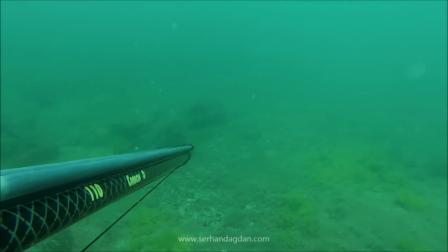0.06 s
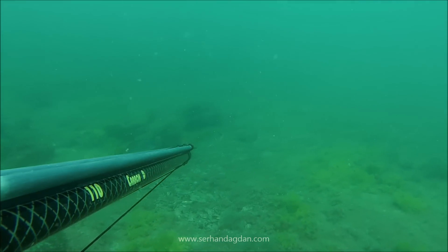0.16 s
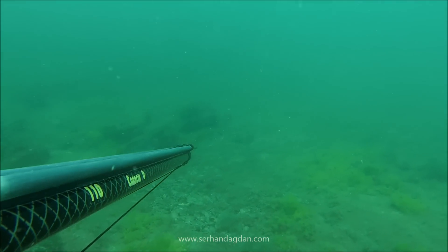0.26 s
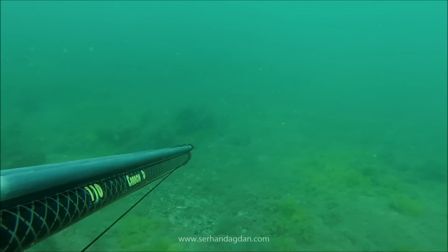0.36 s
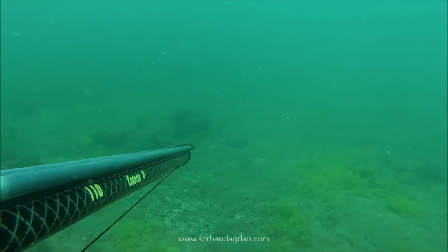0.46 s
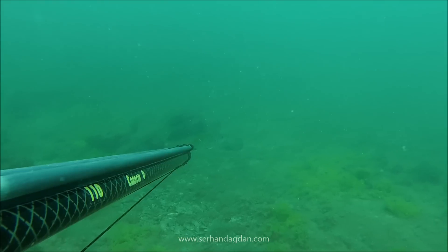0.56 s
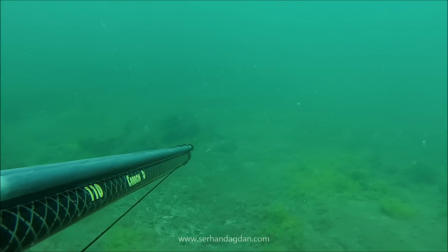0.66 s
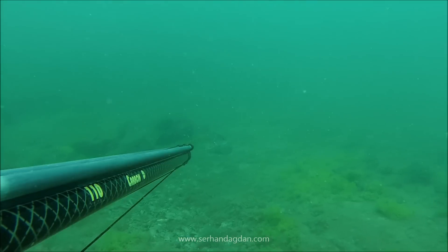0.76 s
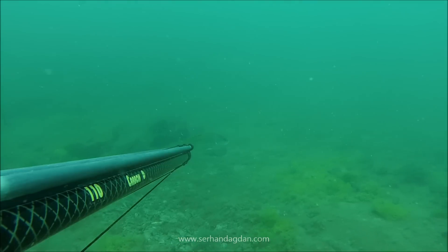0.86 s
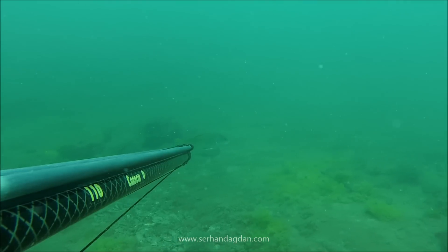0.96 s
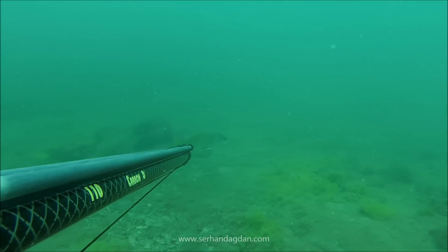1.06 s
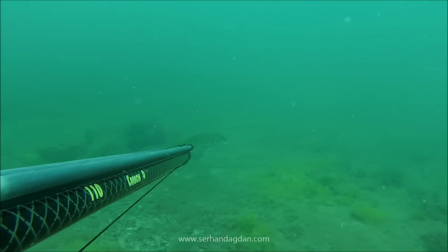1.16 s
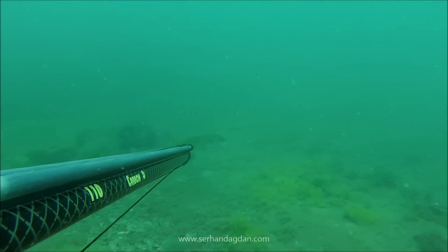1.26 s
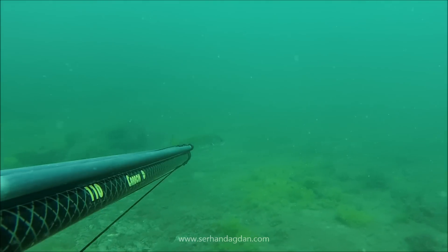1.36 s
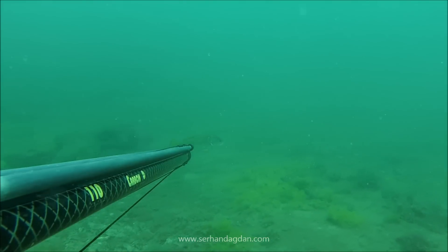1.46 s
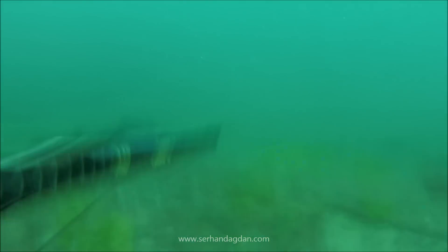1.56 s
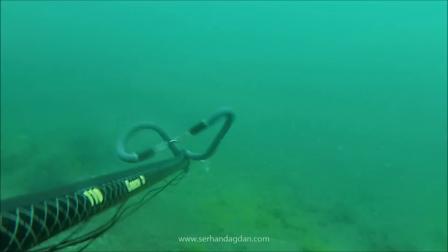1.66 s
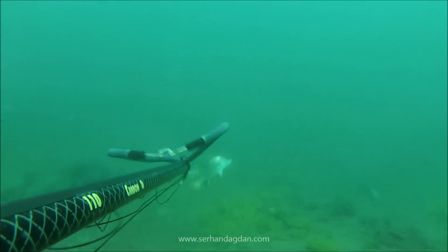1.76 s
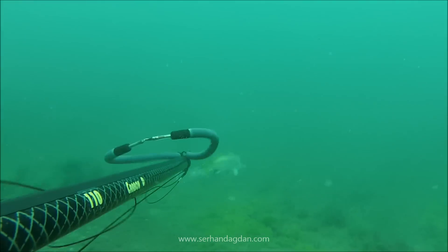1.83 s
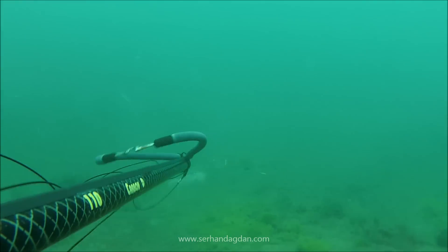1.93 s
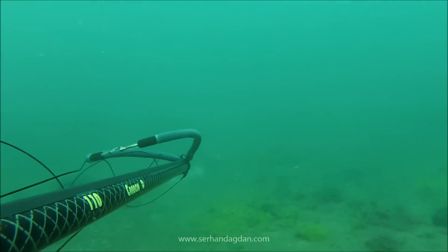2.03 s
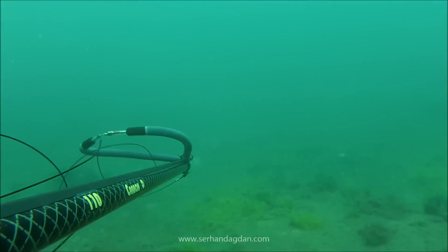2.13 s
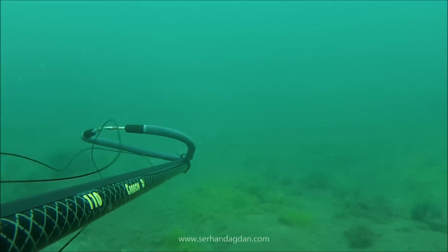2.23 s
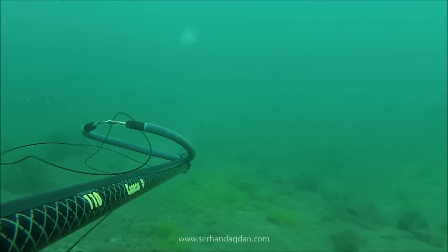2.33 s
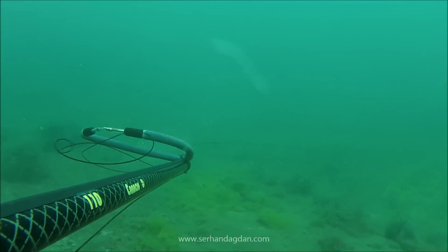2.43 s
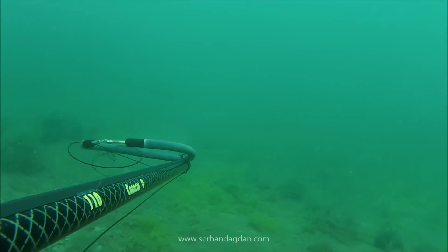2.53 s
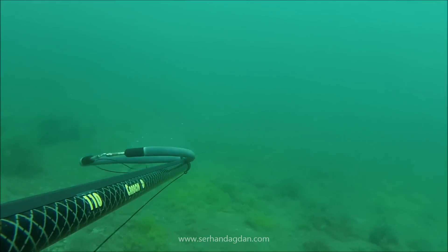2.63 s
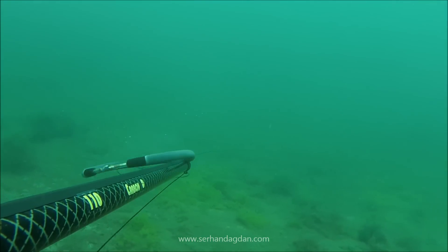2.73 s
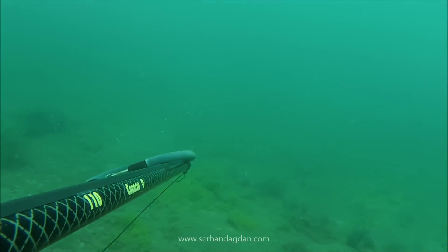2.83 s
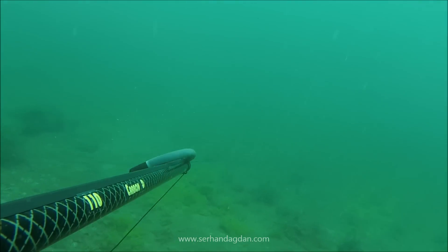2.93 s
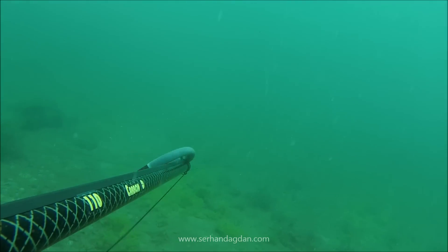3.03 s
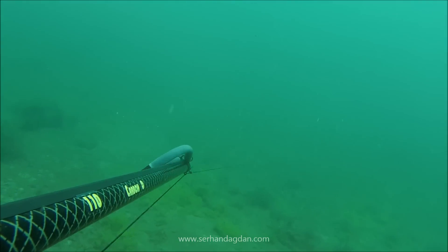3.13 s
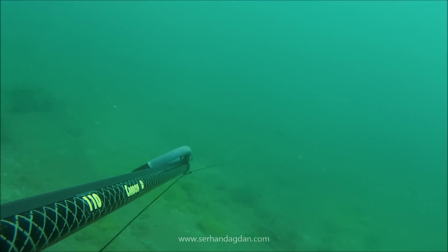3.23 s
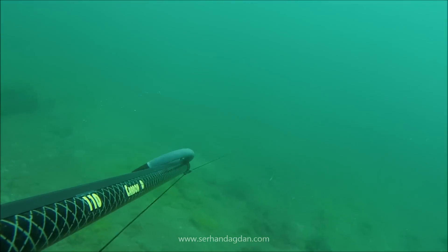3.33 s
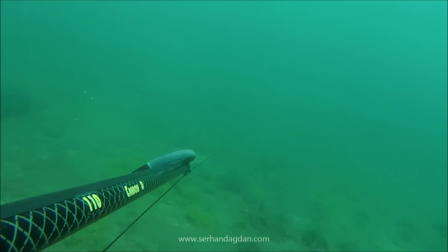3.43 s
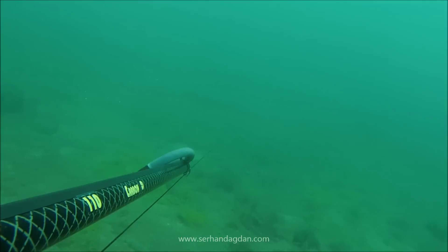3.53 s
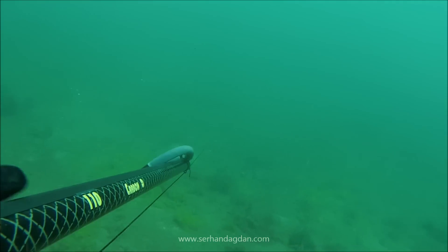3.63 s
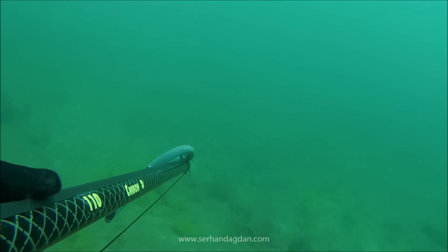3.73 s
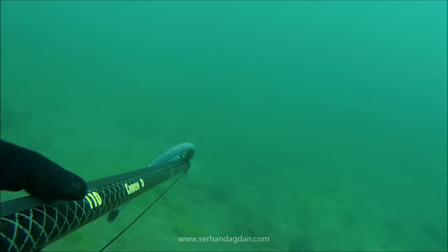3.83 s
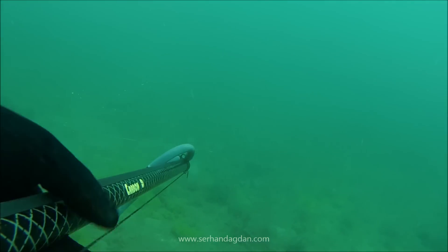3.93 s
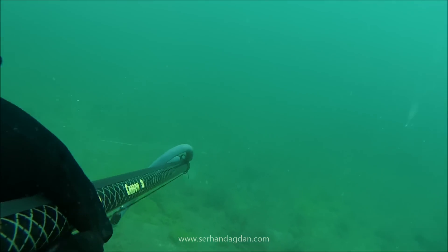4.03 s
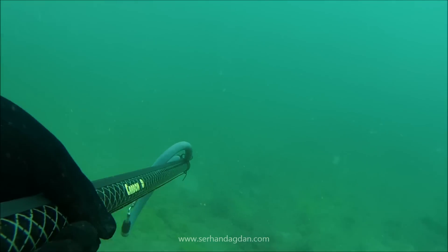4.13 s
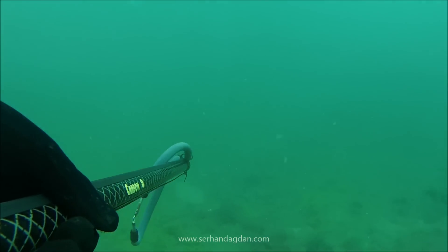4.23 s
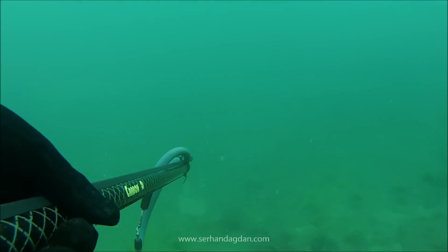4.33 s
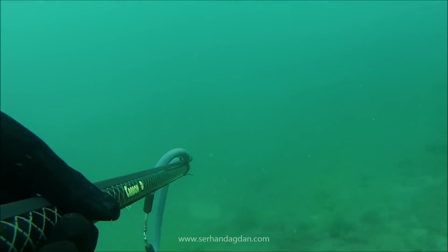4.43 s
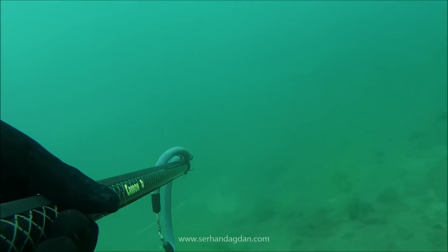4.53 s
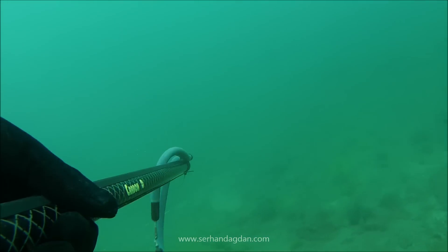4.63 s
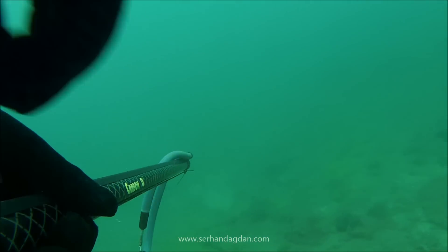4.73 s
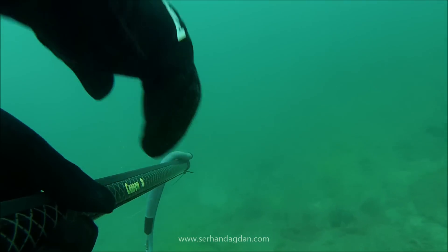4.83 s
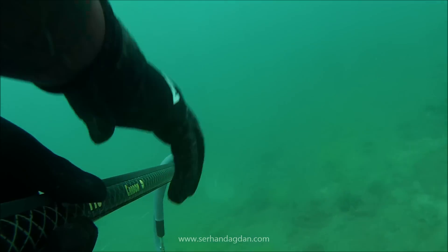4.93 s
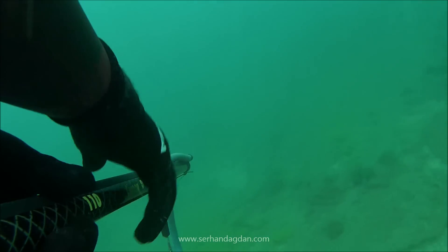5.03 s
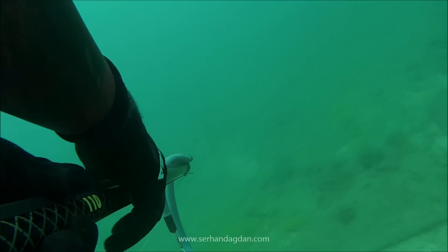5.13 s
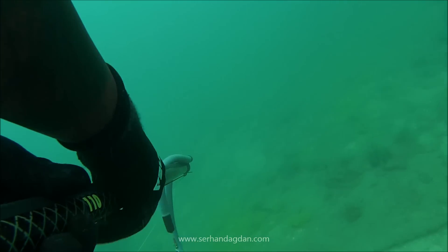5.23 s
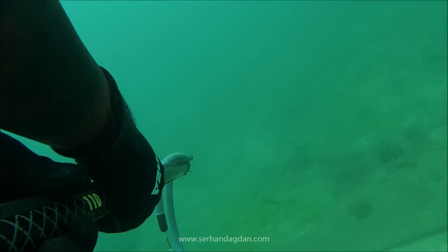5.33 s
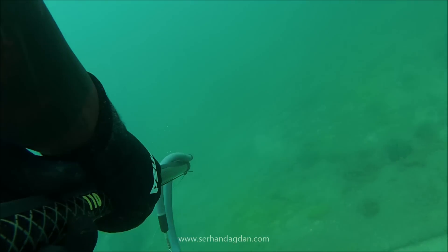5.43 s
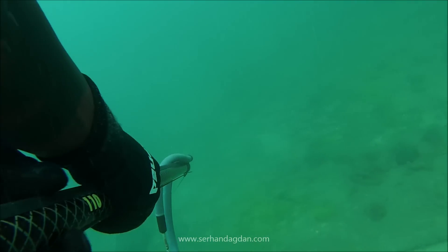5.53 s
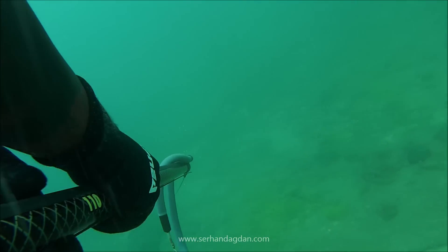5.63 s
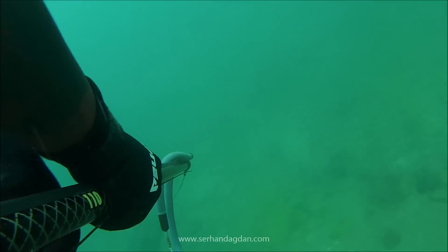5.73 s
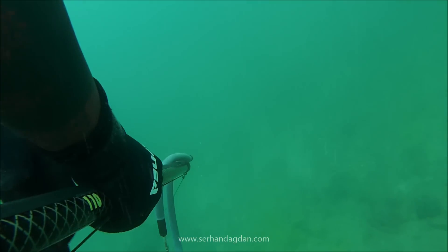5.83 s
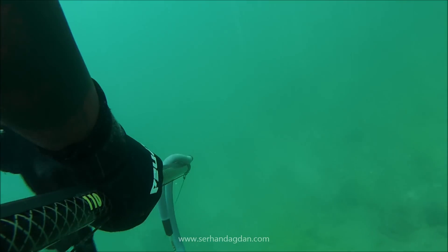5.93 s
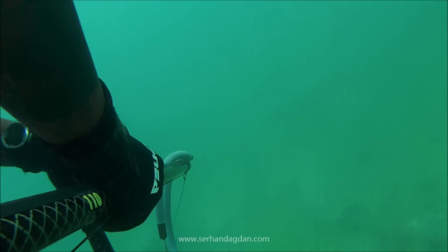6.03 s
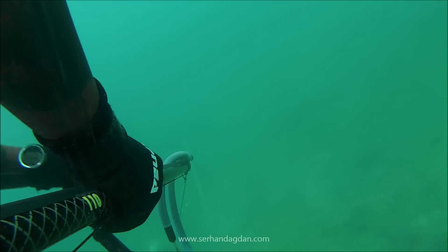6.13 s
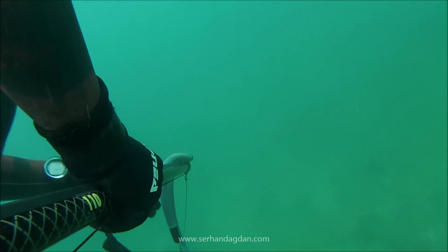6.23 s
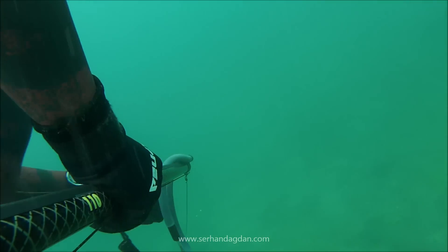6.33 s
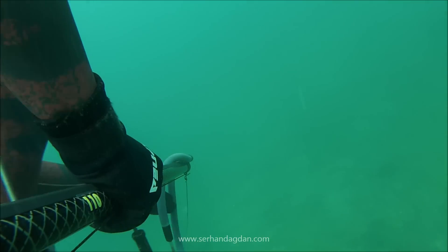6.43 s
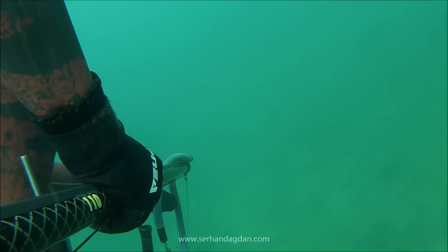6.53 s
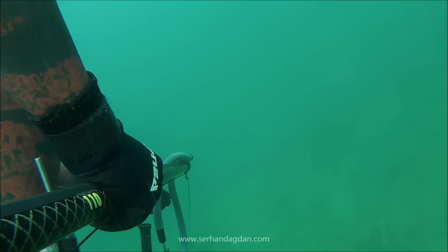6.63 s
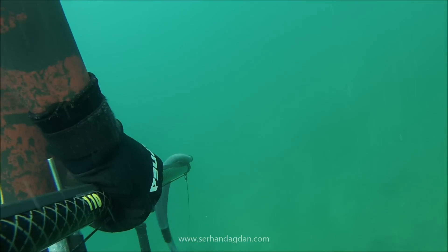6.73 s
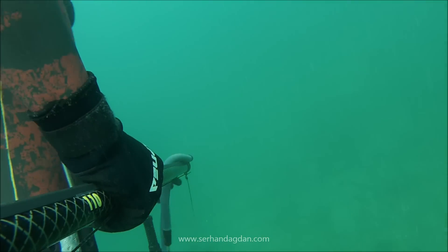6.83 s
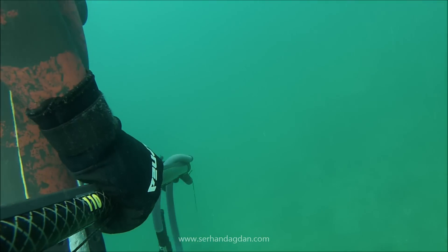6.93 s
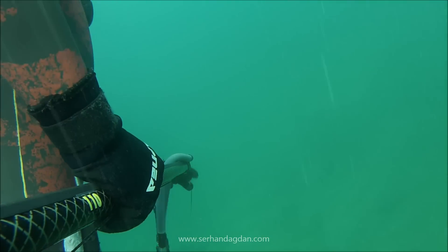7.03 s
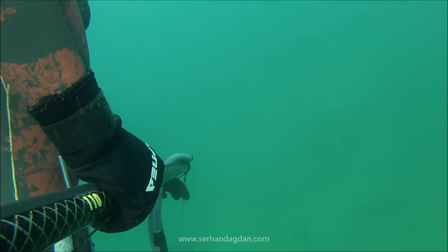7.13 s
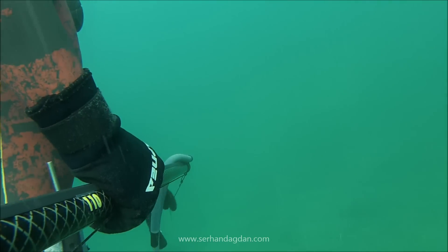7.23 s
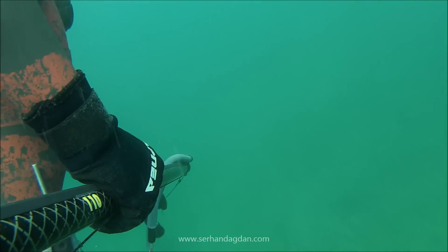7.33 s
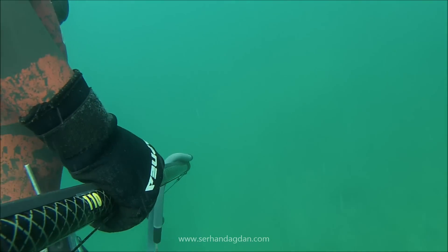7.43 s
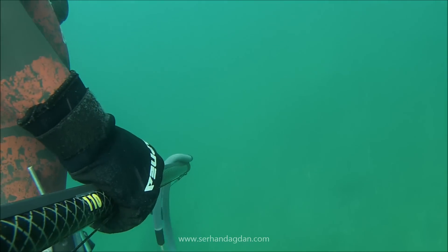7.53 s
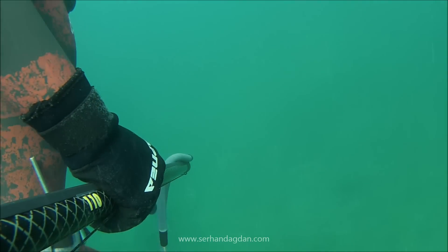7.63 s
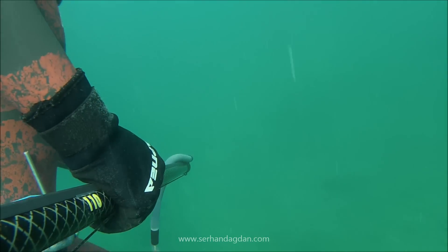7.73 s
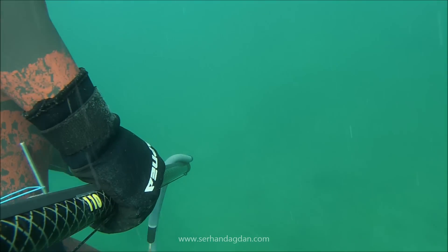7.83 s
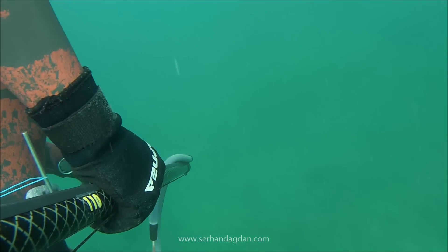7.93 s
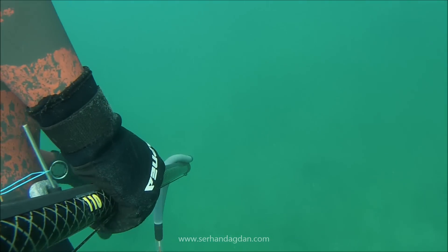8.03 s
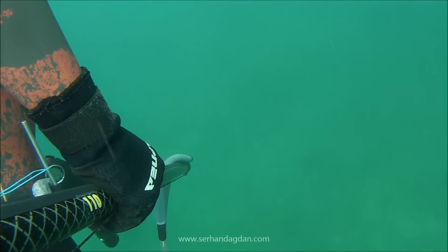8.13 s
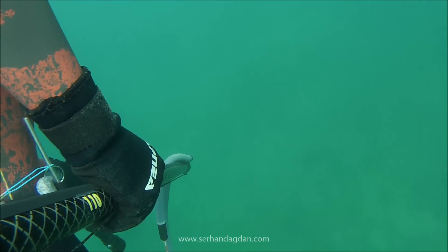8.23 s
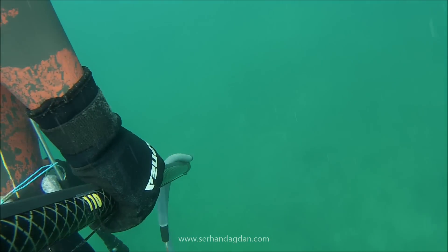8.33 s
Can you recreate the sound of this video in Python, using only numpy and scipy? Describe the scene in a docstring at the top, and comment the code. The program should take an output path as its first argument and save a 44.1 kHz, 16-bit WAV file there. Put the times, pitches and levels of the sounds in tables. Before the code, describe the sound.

Close underwater sound from a microphone in a plastic housing fixed to a speargun. Shrimp snap and hiss over a faint wavering boat drone. After about a second and a half the gun fires with a hard, clipped bang, steel clinks, bubble fizz and low barrel hum. The background dips, then returns as gloved hands knock, rub and thud on the barrel, with rough low water surges, and finally small reel ticks.

```python
"""A speargun fires under water: bands snap, steel clinks, bubbles fizz and the barrel hums, all short noise
pushes ringing the gun. Gloved hands then rub, catch and knock the barrel and wind in the line: grains of noise
and blows ring the same modes. Arm movements add a rough low sway and lumpy surge. Behind them shrimp snap,
crackle and hiss, and a far boat engine drones in wavering sine multiples. One microphone in a plastic camera
housing on the gun hears it all; its gain ducks after loud peaks and creeps back."""
import sys
import numpy as np
from scipy import signal
from scipy.fft import rfft, irfft, next_fast_len
from scipy.io import wavfile
from scipy.ndimage import uniform_filter1d, map_coordinates

SR = 44100
rng = np.random.default_rng(int(sys.argv[2]) if len(sys.argv) > 2 else 0)


def wav_out(sig):
    """Save sig, one row per channel (or a flat mono array), as 16-bit PCM at SR to the path in sys.argv[1]."""
    wavfile.write(sys.argv[1], SR, np.round(np.clip(np.atleast_2d(sig).T, -1, 1) * 32767).astype(np.int16))


N = 369116
T = np.arange(N) / SR

# Source levels in all tables come before the gain control.
# Far engine speed: [t/s, firing rate/Hz]
FIRING_RATE = [(0, 19.1), (.5, 18.7), (.95, 19.05), (1.5, 18.75), (1.8, 20.2), (2.3, 18.6), (2.75, 20),
               (3, 19.5), (4.2, 18.6), (7.2, 19.2), (7.55, 18.8), (8.37, 19.3)]
# Engine multiples that hold their mean level: [multiple, level/dB]
STEADY_MULTIPLES = [(3, -73), (4, -61.5), (5, -57), (9, -69), (10, -75.5)]
# Drone colour as the surface echo shifts: [t/s, loudest multiple, its level/dB]
DRONE_COLOUR = [(0, 8, -56.5), (.3, 7.2, -49), (.57, 7.7, -49), (.74, 6.8, -49.5), (1.1, 7.5, -47),
                (1.36, 7.6, -51), (1.52, 6, -47), (2.1, 6.2, -51.5), (2.45, 6, -50), (2.7, 6.8, -48),
                (3, 6.4, -49.5), (4.3, 6.9, -56.5), (7.2, 6.8, -51.5), (7.5, 6.6, -54.5), (7.85, 6, -52.5),
                (8.1, 6.8, -54), (8.37, 6.9, -50.5)]
# Loss one multiple off the loudest (grows with the square), greatest loss, unsteadiness
DRONE_FALL_DB, DRONE_DEPTH_DB, DRONE_WAVER_DB = 8.5, 8.5, 2.5

# Near shrimp snaps: [t/s, middle peak level/dB, ring re middle/dB, treble re middle/dB before a 3.5 dB lift]
SNAPS = [(0.0338, -43.5, -3, -5.5), (0.1094, -47, -2.5, -15), (0.1184, -45.5, -16, -0.5),
         (0.162, -47.5, -12, -3), (0.2262, -38.5, -13, -11), (0.3408, -44, -10, -21), (0.389, -44, -3, -15),
         (0.5278, -38.5, -13, -14), (0.6598, -47, 1, 1.5), (0.7163, -45, -10, -11),
         (0.7796, -40.5, -21, -12), (0.818, -51, -5, -15), (0.8593, -34, -4.5, -6), (0.904, -44, 2, -12),
         (0.9352, -40, -7.5, 0), (0.947, -51, 11, -15), (0.987, -34, -12.5, -5.5), (1.0705, -44.5, -7, -15),
         (1.0896, -36.5, -6, -11), (1.1467, -52.5, 16.5, -19), (1.226, -50, 5, -9),
         (1.3224, -47.5, -14, -9), (1.379, -43, -4, -9), (1.475, -44.5, -7, -4.5),
         (1.503, -34.5, -6.5, -19), (1.5625, -41, 0, -4), (1.793, -54.5, 19, -6), (1.888, -36.5, -2.5, -15),
         (2.0133, -40, -22, -3), (2.091, -41, -3, -15), (2.2022, -37, -0.5, -29), (2.231, -27.5, -25, -34),
         (2.3338, -51.5, 15.5, -15), (2.4443, -49.5, -9, -19), (2.5496, -43.5, -5, -15),
         (2.6912, -44, -12, -6), (2.7533, -42, 4.5, -31), (2.891, -35.5, -8, -25),
         (2.9725, -49, -10.5, -17), (3.116, -35, -14, -14), (3.1404, -43, -10, 1), (3.1805, -34, -4, -30),
         (3.243, -39, -1.5, -21), (3.295, -29.5, -1, -14), (3.353, -40, -1, -23), (3.4176, -41.5, -5, -15),
         (3.456, -44.5, -5.5, -2), (3.569, -46, 2, -2), (3.7592, -40, 2, -11), (3.851, -41, -8, -11),
         (3.9583, -43.5, -2.5, -22), (4.023, -41, -8.5, -16), (4.0727, -38, -6, -33),
         (4.2308, -45, -5, -19), (4.2582, -41, -10, -17), (4.33, -50, 6.5, -18), (4.3601, -41.5, -11, -20),
         (4.5271, -42, -17, -15), (4.564, -47.5, -10, -15), (4.6323, -38, -7, -21.5),
         (4.7544, -46, -4, -12), (5.0617, -39.5, 4, -11), (5.08, -40, -3, -12), (5.1713, -42.5, -8.5, -6),
         (5.2322, -50.5, -12, -17.5), (5.2879, -38, -8.5, -16), (5.316, -31, -11.5, -24),
         (5.3534, -42, -12, -15), (5.5608, -50.5, -2.5, -19), (5.5967, -43.5, -12, -20),
         (5.6371, -44.5, -6.5, -18), (5.7084, -45, -5, -14.5), (5.7948, -33.5, -15, -35),
         (5.972, -22, -10.5, -52), (6.005, -35, -5.5, -26), (6.141, -42.5, 6, -21), (6.202, -42, -7.5, -19),
         (6.569, -42.5, -15.5, -25), (6.644, -40, -11, -5), (6.716, -42.5, -4.5, -18),
         (6.9847, -46, -6, -20), (7.02, -36.5, -20, -24), (7.1027, -33, -32, -6), (7.304, -38, -11.5, -14),
         (7.3332, -38, -22, -23), (7.3794, -45, -15, -18), (7.4117, -51, -13.5, -22),
         (7.4518, -42.5, -13, -22), (7.4912, -46.5, -17, -25), (7.5278, -46, -12, -21),
         (7.604, -42.5, -11, -9), (7.6205, -47.5, 9.5, -7), (7.7289, -41.5, -8, -11),
         (7.8296, -32.5, -5, -12), (7.901, -43, -24, -21), (7.935, -46, -14, -15), (8.025, -45.5, -14, -24),
         (8.0446, -44.5, -15, -23), (8.0717, -43.5, -24, -17), (8.12, -40, -16, -17),
         (8.173, -45, -10, -21)]
# Housing resonances: [f/Hz, width/Hz before widening, level/dB]
HOUSING_MODES = [(314, 160, 2), (782, 97, 6), (1060, 142, -2), (1485, 685, -11), (1901, 173, 6),
                 (2120, 418, -6.5), (3080, 378, -0.5), (4010, 710, -7), (5050, 710, -12.5),
                 (5660, 520, -11), (6860, 700, -13), (8670, 970, -18.5), (10620, 1100, -17),
                 (14500, 1900, -36.5)]
# Shrimp crackle balance for low, ring, middle and treble: [level/dB]
CRACKLE_BAND_DB = [-3.5, -0.5, 0, -0.5]
SEA_DB = -56.5

# Arm movements swing the gun and push water: [t/s, length/s, sway f/Hz, sway level/dB, surge level/dB]
ARM_MOVES = [(0, 0.15, 21, -44.5, -75), (0.886, 0.42, 21.5, -53, -62), (1.624, 0.11, 21, -36, -22.5),
             (1.825, 0.082, 20.7, -27, -27.5), (1.983, 0.3, 20.8, -33, -45), (2.416, 0.098, 21, -42, -60),
             (2.849, 0.14, 25, -43, -42), (3.093, 0.26, 18.7, -35.5, -38.5),
             (3.404, 0.22, 21.5, -26.5, -47), (3.62, 0.24, 16.88, -30, -35),
             (3.898, 0.12, 18.22, -25.5, -40), (4.111, 0.044, 18.19, -33.5, -42),
             (4.263, 0.096, 19, -50, -41.5), (4.472, 0.19, 21, -30.5, -45), (4.787, 0.12, 20.85, -33, -49),
             (4.995, 0.12, 20.63, -28.5, -50), (5.217, 0.045, 20.9, -28, -45),
             (5.351, 0.12, 20.93, -25.5, -60.5), (5.59, 0.032, 20.44, -29.5, -43),
             (5.79, 0.11, 19.7, -30.5, -42), (6.014, 0.069, 21.2, -28, -31), (6.16, 0.34, 20.9, -33.5, -29),
             (6.65, 0.27, 23, -29.5, -45), (7.018, 0.036, 17.83, -31, -40.5),
             (7.148, 0.37, 20.6, -44.5, -52), (7.595, 0.13, 23.27, -37.5, -46), (7.81, 0.2, 19, -38.5, -50),
             (8.15, 0.26, 22.2, -43, -58)]
# Times for 20 dB; surge level between movements
MOVE_RISE_S, MOVE_FALL_S, SURGE_FALL_S, CALM_DB = 0.054, 0.072, 0.19, -71

# Barrel modes before the padding: [f/Hz, width/Hz before any widening, level/dB]
BARREL_MODES = [(103.8, 25.2, -4), (158.3, 29, -5), (180.8, 15.6, 0.5), (231.4, 20.2, 0.5),
                (346, 1100, -13.5)]
# Handle and mount modes: [f/Hz, width/Hz before widening, level/dB]
HANDLE_MODES = [(492, 69, 2.5), (545, 56.6, 6), (627, 87, 6), (771, 34, 4.5), (910, 11, -32),
                (1210, 190, -20.5), (1458, 190, -20), (1794, 170, -27)]

# Loose line chattering on the reel: [t/s, length/s, level/dB]
LINE_CHATTER = [(1.655, 0.033, -42), (1.76, .03, -44), (1.84, 0.05, -57), (3.044, 0.042, -55),
                (4, 0.18, -63), (4.89, .12, -61.5), (5.084, .05, -61), (6.096, 0.05, -62)]
# Reel resonances under the chatter: [f/Hz, width/Hz before widening, level/dB]
CHATTER_MODES = [(1288, 100, -0.5), (1410, 110, -5)]
# Reel ticks as the line is wound: [t/s, peak level/dB]
REEL_TICKS = [(4.584, -43.5), (5.391, -44.5), (5.6006, -44), (6.838, -37), (6.859, -47), (7.086, -40),
              (7.18, -47), (7.2921, -42), (7.399, -42), (7.4973, -41), (7.587, -40.5), (7.7472, -39.5),
              (7.876, -40), (8.016, -41), (8.143, -40)]
# Blows on the gun: [t/s, handle peak level/dB, thump re handle/dB, clack re handle/dB before a 0.5 dB lift]
KNOCKS = [(1.063, -46, -15, -25), (1.163, -46, -18, -5), (1.383, -47, -22, -25), (1.659, -20, 7.5, -4),
          (1.667, -16.5, -12, -6), (1.676, -18, -6, -5), (1.689, -33.5, 11, 2), (1.706, -31, 11, -3),
          (1.727, -27, -8, -5), (1.761, -27.5, -8, -19), (1.787, -28, -20, -4), (1.802, -30, -23, 1),
          (1.813, -20, -18, -9), (2.205, -22.5, -17, -5), (2.216, -38, -17, 1), (2.234, -33.5, -27, 5),
          (2.249, -33, 3.5, -3), (2.277, -41, 0, -8), (2.593, -42.5, 3, 3), (2.605, -46, -2, -22),
          (2.638, -46, -5, -17), (2.661, -39, -10, -7), (2.671, -46, -12, -7), (3.032, -49, -2, 10),
          (3.065, -33.5, -1, -8), (3.199, -30, 2, -15), (3.268, -30, 1, 0.5), (3.297, -24.5, -4, -2.5),
          (3.343, -33.5, -13, 1), (3.777, -34, 1, 2), (3.827, -44, -7, -2), (3.846, -36, 0, 5),
          (3.945, -50.5, -5, 7), (3.966, -48.5, 10, -12), (3.983, -25.5, -18, -16), (3.994, -35, -12, 2),
          (4.004, -39, -15, -5), (4.074, -29, -12, -11.5), (4.096, -39, -5, -5), (4.136, -53, -8, 4),
          (4.397, -33.5, -5, 2.5), (4.409, -37.5, -9, 2), (4.419, -31, -9, -4), (4.769, -29.5, 5, -25),
          (5.005, -42, -7.5, -4), (5.0599, -35.5, 3.5, 7.5), (5.623, -42, 10, -21), (5.886, -33, 4.5, -26),
          (5.915, -34, 5, -23), (5.972, -26.5, -23, -33), (6.004, -40, 6, -20), (6.101, -43, -9, -5),
          (6.121, -28.5, 4, -13), (6.13, -31, 12.5, -14.5), (6.174, -29.5, 9, -14), (6.185, -39, 10, -10),
          (6.289, -34.5, 8.5, -12), (6.34, -23, 4.5, -5), (6.393, -35, 6.5, -36.5),
          (6.507, -33.5, -18, -23), (6.516, -38, -28, -25), (8.326, -37, -6, -24)]

# Heel of the hand on the barrel: [t/s, peak level/dB]
THUDS = [(3.57, -33), (3.679, -34.5), (3.841, -28.5), (6.144, -20), (6.194, -22), (6.239, -24),
         (6.301, -21.5), (6.352, -27), (6.392, -31), (6.887, -32.5), (6.938, -28.5)]
# Glove catches on the handle: [t/s, peak level/dB before a 3.5 dB cut, loudest f/Hz]
GLOVE_CATCHES = [(3.081, -25, 666), (3.099, -43, 606), (3.129, -38, 689), (3.16, -25, 695),
                 (3.177, -26, 630), (3.212, -40, 680), (3.244, -31, 570), (3.297, -26, 600),
                 (3.431, -42, 553), (3.461, -29, 610), (3.498, -28, 595), (3.514, -26.5, 570),
                 (3.544, -29.5, 570), (3.566, -28.5, 537), (3.589, -34, 574), (3.62, -36, 480),
                 (3.679, -30, 597), (3.711, -28, 590), (3.752, -24.5, 640), (3.764, -30, 627),
                 (3.832, -31, 697), (3.916, -41, 724), (3.964, -36.5, 768), (3.994, -28.5, 737),
                 (4.037, -32, 626), (4.094, -40, 780), (4.448, -33, 720), (4.469, -30, 707),
                 (4.489, -32, 654), (4.529, -46, 757), (4.974, -47, 616), (5.019, -45, 533),
                 (5.074, -31, 560), (5.14, -31.5, 560), (5.212, -38, 557), (5.298, -37.5, 681),
                 (5.387, -32.5, 550), (5.419, -44, 692), (5.494, -35, 594.5), (5.552, -42, 619),
                 (5.639, -29, 706), (5.662, -32, 725), (5.704, -36, 710), (6.174, -19, 460),
                 (6.189, -37, 516), (6.607, -30, 730), (6.63, -25.5, 463), (6.645, -27.5, 476),
                 (6.659, -33, 637), (6.776, -38.5, 765), (6.799, -34, 646), (6.839, -34, 664),
                 (6.893, -36, 453), (6.93, -39, 726), (7.002, -34, 681), (7.182, -42, 726),
                 (7.266, -50, 496), (7.34, -35.5, 513), (7.365, -37, 515)]
# Hands, bands and line rubbing: [t/s, length/s, barrel level/dB, handle level/dB, loudest handle f/Hz]
STROKES = [(1.661, 0.016, -36, -30, 640), (1.71, 0.032, -37, -43.5, 595), (1.804, 0.069, -33, -35.5, 714),
           (1.847, 0.026, -36.5, -51.5, 747), (2.19, 0.046, -44.5, -42.5, 715),
           (2.591, 0.19, -59, -53.5, 753), (3.067, 0.04, -39, -41, 690), (3.156, 0.067, -35, -41, 680),
           (3.246, 0.041, -34.5, -46, 600), (3.382, 0.023, -42, -49.5, 540), (3.457, 0.094, -38, -45, 560),
           (3.624, 0.037, -34.5, -41.5, 600), (3.713, 0.042, -39, -41.5, 660),
           (3.82, 0.023, -41.5, -44.5, 727), (3.949, .05, -38.5, -43, 734), (4.042, 0.025, -42.5, -41, 590),
           (4.407, 0.13, -41.5, -44, 670), (4.769, 0.069, -39.5, -56, 590), (4.964, 0.12, -43, -47.5, 636),
           (5.129, 0.12, -40.5, -52, 615), (5.304, 0.26, -44.5, -48, 672), (5.596, 0.14, -46, -44.5, 618),
           (5.884, 0.025, -45, -45, 554), (5.978, 0.094, -40.5, -45.5, 542), (6.126, 0.0088, -28, -42, 540),
           (6.188, 0.14, -40, -50, 513), (6.346, 0.046, -43, -45, 592), (6.434, 0.091, -43, -54, 650),
           (6.596, 0.034, -38, -40.5, 543), (6.682, 0.075, -57, -51, 570), (6.793, 0.16, -39.5, -48, 590),
           (7, 0.29, -48.5, -54, 618), (7.293, 0.2, -45, -48, 510), (7.575, .6, -48, -55.5, 597),
           (8.26, 0.061, -54, -52, 560)]
RUB_RISE_S, RUB_FALL_S, RUB_WAVER_DB = 0.047, 0.11, 0.5  # times for 20 dB; wavering pressure
STILL_DEEP_DB = -66  # water lapping the barrel between strokes

# Trigger, bands, shaft: [t/s, handle peak level/dB, clack re handle/dB, crack re handle/dB,
# base length/s (each layer scales it), handle f/Hz]
SHOT_PUSHES = [(1.607, -24, 11, -10.5, 0.009, 734), (1.619, -5, -6, -14.5, 0.005, 641),
               (1.6225, -7, -1.5, -18, 0.0029, 610), (1.622, -17, -12.5, 8.5, 0.00062, 634),
               (1.628, -0.5, 0, -15.5, 0.0046, 683), (1.638, -33.5, 11.5, -22, 0.029, 700)]
# The shot's crack, before its treble loss: [f/Hz, width/Hz, level/dB]
CRACK_MODES = [(2300, 900, -1.5), (3600, 1300, 5.5), (4940, 860, 1), (7300, 1300, -7.5)]
# Steel fittings clinking after the shot: [t/s, peak level/dB, f/Hz]
STEEL_CLINKS = [(1.689, -16.5, 1800), (1.727, -33, 2000), (1.706, -22.5, 1350), (1.664, -27, 1300),
                (1.678, -19, 1440), (1.733, -34, 1300), (1.762, -33, 1200), (1.79, -20.5, 1300),
                (1.813, -23.5, 1300), (2.2, -37, 1250)]

MIC_HISS_DB, TOP_HZ = -86, 15700


def amp(db):
    """Gain of a level in dB."""
    return 10 ** (np.asarray(db) / 20)


def unit(x):
    """x at rms 1."""
    return x / np.sqrt(np.mean(x ** 2) + 1e-20)


def curves(rows):
    """One value per sample for each column after the time."""
    s, *cols = np.transpose(rows)
    return [np.interp(T, s, c) for c in cols]


def wobble(rate):
    """A smooth random curve, rate knots a second."""
    return map_coordinates(rng.standard_normal(int(N * rate / SR) + 4), [T * rate])


def filtered(x, response):
    """x through a complex frequency response, with room for the tail."""
    m = next_fast_len(N + SR // 2)
    return irfft(rfft(x, m) * response(np.fft.rfftfreq(m, 1 / SR)), m)[:N]


def modes(table):
    """Causal response of a few resonances, neighbours in opposite sign."""
    def response(f):
        total = 0
        for k, (hz, width, db) in enumerate(table):
            total = total + (-1) ** k * amp(db) * 1j * f * width / (hz * hz - f * f + 1j * f * width)
        return total
    return response


def steep(table, wider=0.96):
    """Resonances applied twice: the mount passes little between and above them."""
    halves = [(hz, wider * width, db / 2) for hz, width, db in table]
    return lambda f: modes(halves)(f) ** 2


def soft(response, corner_hz):
    """A padded contact takes the treble off with a two-pole slope."""
    return lambda f: response(f) / (1 + 1j * f / corner_hz) ** 2


def housing(f, first=0, last=None):
    """Sound through the housing wall, by all or some of its resonances."""
    return steep(HOUSING_MODES[first:last], wider=1.6)(f)


def treble(f):
    """The treble of a contact, through the upper housing modes."""
    return housing(f, first=5)


def barrel(f):
    """The deep modes under a padded hand."""
    return soft(soft(modes(BARREL_MODES), 330), 400)(f)


def clack(f):
    """Hard contact rings the high handle modes."""
    return steep(HANDLE_MODES[5:], wider=1.6)(f)


def nearness(place_hz):
    """How strongly each low handle mode answers a hand placed for this pitch."""
    near = []
    for hz, _, _ in HANDLE_MODES[:4]:
        near.append(np.exp(-.5 * (np.log(place_hz / hz) / 0.094) ** 2) + 0.028)
    near = np.array(near)
    return near / np.sqrt(np.sum(near ** 2, axis=0))


def held(place_hz, wider):
    """The low handle modes for one place of the hand."""
    shares = nearness(place_hz)
    return lambda f: sum(share * steep([mode], wider)(f) for share, mode in zip(shares, HANDLE_MODES))


def bursts(times, dbs, t60s, response, rise=0.00013, blow=0, size=8192, span=N):
    """Dying noise pushes, led by a blow if given, through a body; each brought to its own peak level."""
    out = np.zeros(span + SR)
    body = response(np.fft.rfftfreq(2 * size, 1 / SR))
    t = np.arange(size) / SR
    for s, db, t60 in np.broadcast(times, dbs, t60s):
        push = rng.standard_normal(size) * amp(-60 * t / t60) * (1 - np.exp(-t / rise))
        push[0] = blow * np.linalg.norm(push)
        ring = irfft(rfft(push, 2 * size) * body)[:size]
        out[round(s * SR):][:size] += amp(db) * ring / np.abs(ring).max()
    return out[:span]


def grains(per_s, spread_db):
    """Random impulses; a few are much larger."""
    size_db = spread_db * np.minimum(rng.exponential(size=N), 3.3)
    return (rng.random(N) < per_s / SR) * rng.standard_normal(N) * amp(size_db)


def swells(start, length, db, rise_s, fall_s):
    """One gain per event, every millisecond: a rise, a hold, a fall."""
    t = np.arange(0, N / SR + .001, .001)[:, None]
    before = np.maximum(start - t, 0)
    after = np.maximum(t - start - length, 0)
    return amp(db - 20 * before / rise_s - 20 * after / fall_s)


def joined(gains, values=None):
    """The events' power-summed gain, or the mean of their values weighted by power, one per sample."""
    power = np.sum(gains ** 2, axis=1) + 1e-30
    line = np.sqrt(power) if values is None else gains ** 2 @ values / power
    return np.interp(T, np.arange(len(line)) / 1000, line)


def add(out, s, sound):
    """Mix sound into out from time s."""
    part = out[round(s * SR):][:len(sound)]
    part += sound[:len(part)]


def engine():
    """Multiples of the firing rate; surface echoes let strong ones wax and wane, phase lags grow upwards."""
    turn = 2 * np.pi * np.cumsum(curves(FIRING_RATE)[0]) / SR
    loudest, level_db = curves(DRONE_COLOUR)
    multiples = list(STEADY_MULTIPLES)
    for k in range(6, 9):
        loss_db = np.minimum(DRONE_FALL_DB * (k - loudest) ** 2, DRONE_DEPTH_DB)
        multiples.append((k, level_db - loss_db))
    drone = 0
    for k, db in multiples:
        gain = amp(db + DRONE_WAVER_DB * wobble(5))
        slip = .35 * wobble(7)  # radians
        drone = drone + gain * np.sin(k * turn - 0.254 * k * k + slip)
    return np.sqrt(2) * drone


def near_snaps(bands):
    """Near shrimp, each snap of its own colour, with a slower echo smear."""
    s, db, ring_db, bright_db = np.transpose(SNAPS)
    _, ring, middle, top = bands
    snaps = bursts(s, db, 0.034, middle, blow=1.05)
    snaps += bursts(s, db + ring_db, 0.0043, ring, blow=0.36)
    snaps += bursts(s, db + bright_db + 3.5, 0.003, top, blow=0.93)
    return snaps + bursts(s, db - 11.0, 0.024, lambda f: housing(f, first=4), rise=0.0039)


def smeared(snaps):
    """Direct snaps over noise that dies away behind each: many paths behind the direct one."""
    t = np.arange(SR // 20) / SR
    tail = signal.fftconvolve(snaps, amp(-60 * t / 0.021))[:N]
    return np.abs(tail) * rng.standard_normal(N) + 3.1 * snaps


def shrimp():
    """Near snaps through the housing; farther ones crackle, then merge into hiss."""
    bands = [lambda f: housing(f, last=3), lambda f: housing(f, first=3, last=5),
             lambda f: housing(f, first=5, last=8), lambda f: housing(f, first=8)]
    near = near_snaps(bands)
    # neighbours answer each near snap
    volley = uniform_filter1d(np.abs(near), SR // 40, origin=SR // 90)
    volley = uniform_filter1d(volley, SR // 60)
    busy = amp(1.8 * wobble(14)) + .3 * np.minimum(np.abs(unit(volley)) ** .7, 2)
    broad = grains(300, 2.4)  # shared by all bands
    crackle = 0
    for gain, band in zip(amp(CRACKLE_BAND_DB), bands):
        snaps = broad * amp(3.5 * wobble(40)) + grains(350, 2.6)  # the latter fill this band only
        crackle = crackle + gain * filtered(smeared(snaps * busy), band)
    hiss = unit(filtered(rng.standard_normal(N), housing)) * amp(1.3 * wobble(9))
    return near + amp(SEA_DB) * unit(crackle) + amp(SEA_DB - 3.0) * hiss


def water():
    """The gun's slow sway is a rough tone; the surge above it is lumpy noise."""
    start, length, hz, sway_db, surge_db = np.transpose(ARM_MOVES)
    swings = swells(start, length, sway_db, MOVE_RISE_S, MOVE_FALL_S)
    turn = 2 * np.pi * np.cumsum(joined(swings + 1e-9, hz)) / SR
    tone = np.sqrt(2) * np.sin(turn + 0.7 * wobble(2.33))
    drift = unit(filtered(rng.standard_normal(N), steep([(15.42, 11.6, 0)])))
    lumps = filtered(rng.standard_normal(N), lambda f: modes([(34, 18, 1.5), (55, 24, 0)])(f) ** 2)
    surge = joined(swells(start, length, surge_db, MOVE_RISE_S, SURGE_FALL_S)) + amp(CALM_DB)
    return joined(swings) * (tone + 0.47 * drift) + amp(-50.5) * drift + surge * unit(lumps)


def chatter():
    """Runs of tiny taps from loose line ring the reel."""
    start, length, db = np.transpose(LINE_CHATTER)
    taps = filtered(grains(500, 2.5), steep(CHATTER_MODES, wider=1.6))
    return joined(swells(start, length, db, 0.018, 0.034)) * unit(taps)


def reel():
    """Each tick of the wound reel is a short blow on its own two modes."""
    s, db = np.transpose(REEL_TICKS)
    return bursts(s, db, 0.0088, steep([(1306, 220, -1.5), (2090, 570, -4)]), blow=0.9)


def knocks():
    """Each gloved blow rings handle, barrel and mount, each at its own strength."""
    s, db, deep_db, clack_db = np.transpose(KNOCKS)
    handle = bursts(s, db, 0.013, steep(HANDLE_MODES[:5], wider=2.54), blow=0.81)
    thump = bursts(s, db + deep_db, 0.11, barrel, blow=0.22)
    hard = steep(HANDLE_MODES[4:], wider=1.9)
    return handle + thump + bursts(s, db + clack_db + 0.5, 0.03, hard, rise=0.00064, blow=0.57)


def scrapes():
    """Short catches ring the handle where the hand lies; thuds ring the barrel's main mode."""
    s, db = np.transpose(THUDS)
    out = bursts(s, db, 0.038, steep(BARREL_MODES[2:3], wider=1.75), blow=0.81)
    for s, db, hz in GLOVE_CATCHES:
        handle = held(hz, wider=1.36)
        add(out, s, bursts([0], db - 3.5, 0.027, handle, rise=0.0053, size=4096, span=4096))
    return out


def rubbing():
    """Stick-slip grains, in clumps, ring barrel and handle; where the hand lies picks the loudest mode."""
    start, length, deep_db, upper_db, hz = np.transpose(STROKES)
    press = swells(start, length, upper_db, RUB_RISE_S, RUB_FALL_S)
    place_hz = joined(press + 1e-9, hz) * amp(0.61 * wobble(19))
    deep_press = joined(swells(start, length, deep_db, RUB_RISE_S, RUB_FALL_S))
    deep_gain = deep_press * amp(RUB_WAVER_DB * wobble(26)) + amp(STILL_DEEP_DB)
    deep = unit(filtered(grains(600, 2.3), barrel))
    slips = grains(1500, 1.8) * amp(1.7 * wobble(60))
    handle = 0
    for share, mode in zip(nearness(place_hz), HANDLE_MODES):
        handle = handle + share * filtered(slips, steep([mode], wider=2.12))
    upper = unit(handle) + amp(-19.5) * unit(filtered(slips, clack))
    return deep_gain * deep + joined(press) * amp(RUB_WAVER_DB * wobble(18)) * upper


def firing():
    """Trigger, bands and shaft: violent pushes close together ring handle, mount and crack modes."""
    s, db, clack_db, crack_db, length, hz = np.transpose(SHOT_PUSHES)
    bang = bursts(s, db + clack_db, 1.5 * length, clack, blow=1.6)
    bang += bursts(s, db + crack_db, 3.2 * length, soft(modes(CRACK_MODES), 8900))
    for at, level, t60, pitch in zip(s, db, length, hz):
        bang += bursts(at, level, 2.2 * t60, held(pitch, wider=3.3), blow=0.8)
    return bang


def steel():
    """One bright ping, then fittings clinking, each on a single resonance."""
    out = bursts([1.6213], -12.0, 0.00038, steep([(7230, 880, 0)]))
    for at, level, pitch in STEEL_CLINKS:
        out += bursts([at], level, 0.017, steep([(pitch, 330, 0)]), blow=0.77)
    return out


def bubbles():
    """Bubbles fizz behind the shaft: short noise through the upper housing modes, treble softened."""
    return bursts([1.633, 1.656, 1.705], [-30, -30, -36], [.07, .15, .03], soft(treble, 5000), rise=0.0011)


def barrel_kick():
    """The shot thumps the barrel, which hums out on a narrow low mode."""
    hum = bursts([1.775], -17.5, 0.044, soft(modes([(55.84, 2.5, 0)]), 60), blow=1.9, size=16384)
    thump = bursts([1.619, 1.657], [-18, -18], 0.08, barrel, blow=2.0)
    return hum + thump + bursts([1.659], -12, 0.043, steep([(156.0, 26, 0)]), blow=0.81)


def shot():
    """The speargun's shot: bang, steel, bubbles and barrel together."""
    return firing() + steel() + bubbles() + barrel_kick()


def scene():
    """Everything meets at one microphone."""
    background = engine() + shrimp() + water()
    handling = chatter() + reel() + knocks() + scrapes() + rubbing()
    return (background + handling + shot())[None]


def record(dry):
    """The microphone hisses; gain ducks after loud peaks and creeps back; the input clips; a band limit."""
    hiss = filtered(rng.standard_normal(N), steep([(11500, 5000, 0)]))
    heard = dry[0] + amp(MIC_HISS_DB) * unit(hiss)
    power = np.abs(uniform_filter1d(heard ** 2, SR // 100))
    over_db = np.maximum(10 * np.log10(power + 1e-12) + 21.0, 0)  # above a -21 dB threshold
    release = 13 * T  # 13 dB given back each second
    duck_db = np.maximum(np.maximum.accumulate(over_db + release) - release, 0)
    lag = np.exp(-1 / (0.057 * SR))  # the gain follows with a 57 ms time constant
    x = heard * amp(-signal.lfilter([1 - lag], [1, -lag], duck_db))
    x = x / (1 + np.abs(x / .5) ** 8) ** (1 / 8)  # firm clip towards 0.5
    return filtered(x, lambda f: f < TOP_HZ)[None]


dry = scene()
out = record(dry)
wav_out(out)
```